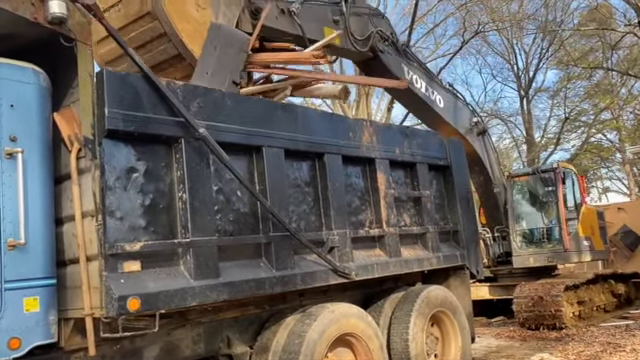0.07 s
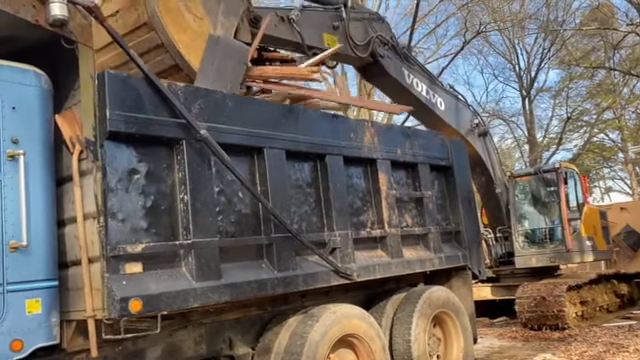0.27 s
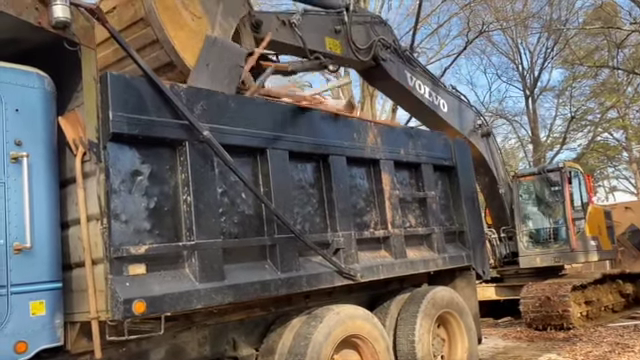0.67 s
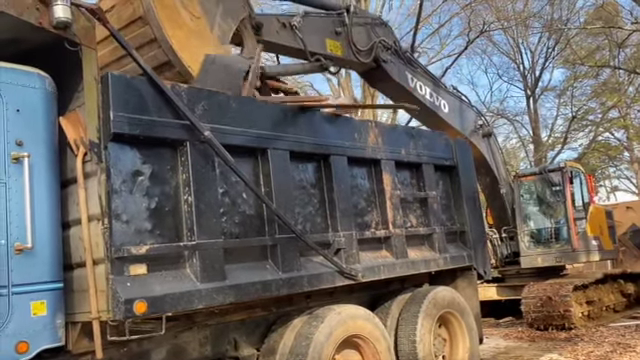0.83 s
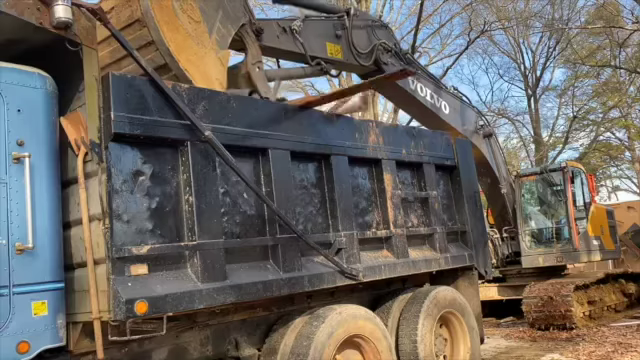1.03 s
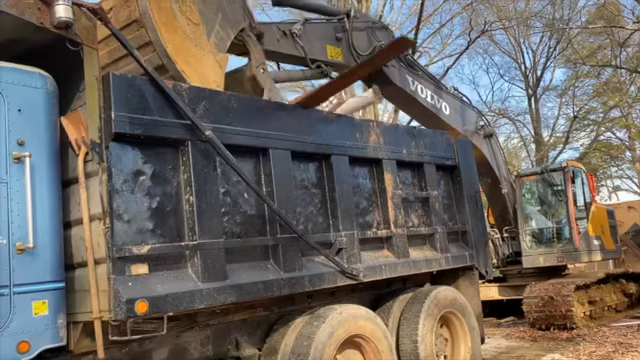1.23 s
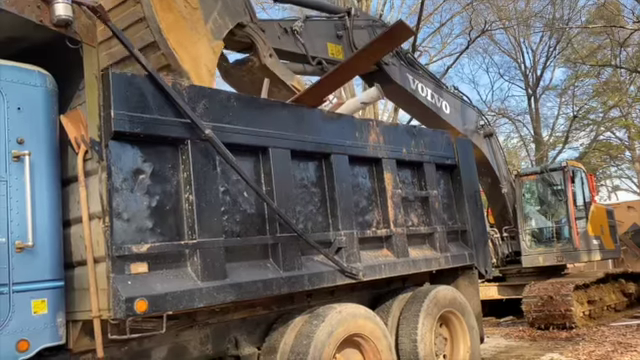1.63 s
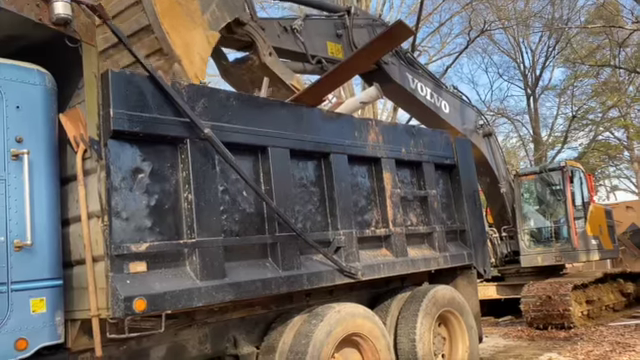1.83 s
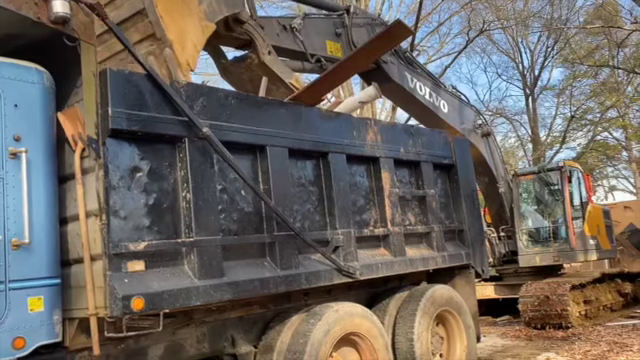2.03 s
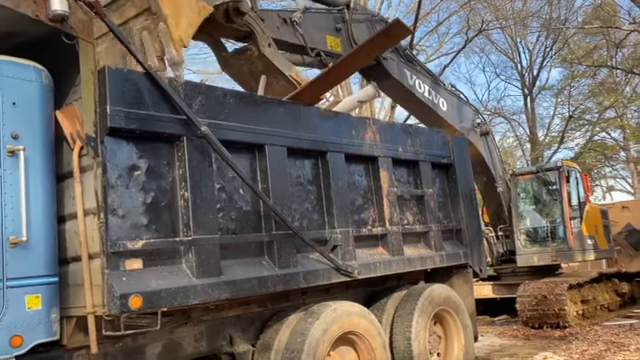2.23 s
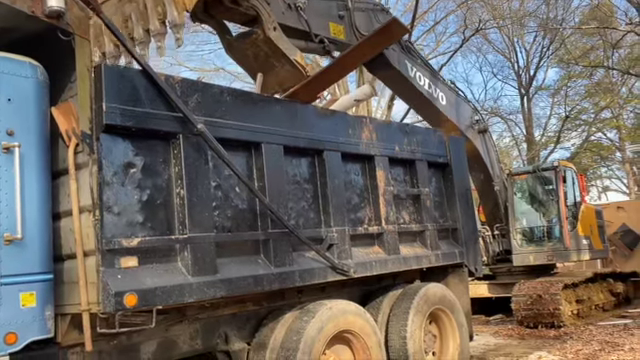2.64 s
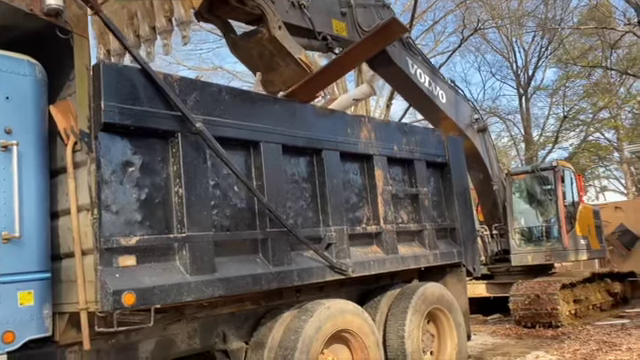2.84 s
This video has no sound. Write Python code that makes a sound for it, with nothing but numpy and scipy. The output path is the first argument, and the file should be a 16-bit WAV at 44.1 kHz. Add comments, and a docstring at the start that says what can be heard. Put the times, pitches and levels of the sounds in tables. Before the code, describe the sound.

Broken timber falls into a steel truck bed over an excavator's steady diesel rumble. After a faint hydraulic hiss, booming thuds begin at about 0.3 seconds. Knocking boards, snapping splinters and crackling grit are busiest around 0.8 to 1.3 seconds, with sharp knocks near 1.6. A short scrape comes at 2 seconds, then a soft last thud and a brief hydraulic whine, before the pump's hum swells from 2.5.

```python
"""An excavator tips a bucket of broken timber into the steel bed of a dump truck.
First the diesel runs, its hydraulic pump hums and oil hisses and sings in the valves.
Then scraps and grit slide out, boards knock, splinters snap and heavy pieces boom on the bed.
Near two seconds the bucket opens with a scrape and a brief whine from the pump.
The last pieces land, the pump's hum swells again and the diesel runs on."""
import sys
import numpy as np
from scipy import signal
from scipy.fft import rfft, irfft
from scipy.io import wavfile
from scipy.ndimage import uniform_filter1d

SR = 44100
rng = np.random.default_rng(int(sys.argv[2]) if len(sys.argv) > 2 else 0)


def output_pcm(signal):
    """Save a mono or channel-first signal as 16-bit PCM at the path in sys.argv[1].

    Samples are clipped to [-1, 1] before scaling.
    """
    pcm = np.clip(np.atleast_2d(signal).T, -1, 1) * 32767
    wavfile.write(sys.argv[1], SR, np.round(pcm).astype(np.int16))


N = 127890
T = np.arange(N) / SR

# The engine shaft slows under load. Each row: time in seconds, turns per second.
SHAFT_SPEED = [(0, 28.15), (.6, 28.2), (1.5, 26.7), (1.95, 28.0), (2.1, 27.3), (2.2, 27.05), (2.36, 27.3),
               (2.52, 27.75), (2.7, 28.1), (2.9, 28.1)]
# The diesel's tones. Each row: multiple of the shaft speed, relative level in dB.
DIESEL_TONES = [(2.5, -43), (3, -32), (5, -34.5), (6, -42.5), (6.75, -38)]
# The diesel works harder as the bucket turns. Each row: time in seconds, boost in dB.
DIESEL_EFFORT = [(0, -10.5), (.6, 2), (1.8, 2), (2.3, 1), (2.9, -3.5)]
# The pump's hum. Each row: time in seconds, level in dB, level of the octave above in dB.
PUMP_LEVELS = [(0, -32.5, -44), (.3, -32.5, -45), (1.0, -46, -62), (1.9, -41, -44), (2.45, -44, -43),
               (2.56, -33, -38), (2.9, -27.5, -35)]
# How loud four sounds are over time. Each row: time in seconds, level in dB.
WHINE_LEVEL = [(1.95, -70), (2.0, -52), (2.16, -52.5), (2.28, -47.5), (2.365, -42.5), (2.45, -47),
               (2.53, -50.5), (2.6, -62), (2.9, -70)]
HISS_LEVEL = [(0, -43.5), (.3, -45), (.42, -48.5), (1.7, -61), (2.2, -76), (2.9, -76)]
SCRAPS_LEVEL = [(0, -80), (.15, -41.5), (.31, -27), (.46, -36.5), (.53, -25.5), (.61, -30), (.75, -27.5),
                (.92, -19), (1.05, -24.5), (1.22, -19), (1.38, -27.5), (1.5, -31), (1.68, -27.5),
                (1.88, -39), (2.9, -67)]
GRIT_LEVEL = [(0, -53.5), (.25, -36), (.42, -48.5), (.5, -45), (.53, -34), (.63, -36), (.85, -33),
              (.98, -26), (1.08, -30.5), (1.16, -31.5), (1.22, -26), (1.3, -35), (1.5, -38.5),
              (1.75, -39.5), (1.87, -45), (2.9, -61)]
# The colour (bass to treble) of each noise. Each row: frequency in Hz, relative level in dB.
RUMBLE_COLOUR = [(25, -28), (45, 1.5), (75, 3), (150, 3.5), (320, -11.5), (600, -11.5), (1200, -18.5),
                 (2200, -25.5), (3500, -31), (6500, -38.5), (15000, -52)]
HISS_COLOUR = [(1000, -15), (2500, -4), (5000, 0), (7000, -2), (10000, -7), (15000, -11)]
MIC_HISS_COLOUR = [(3000, 0), (14500, 0), (16000, -30)]
SCRAPS_COLOUR = [(60, -8), (190, 5.5), (330, -4.5), (520, -2.5), (780, -9.5), (1000, -7.5), (1500, -17),
                 (2500, -30), (5000, -25), (15000, -34)]
GRIT_COLOUR = [(600, -9), (1800, 0), (2600, -2), (3700, -6), (5200, -9), (6700, -10), (10000, -16),
               (15000, -21)]
BUCKET_SCRAPE_COLOUR = [(900, -28), (1700, -11), (2150, 7), (2900, -9), (9000, -29)]
# The singing valves. Each row: pitch in Hz, starting level in dB.
VALVE_TONES = [(4969, -53), (5975, -56)]
# The steel bed's high notes. Each row: pitch in Hz, relative level in dB.
BED_HIGH_NOTES = [(895, -17), (1132, -17.5), (1476, -17.5), (1726, -23.5), (1832, -25), (1931, -16.5),
                  (2126, -21.5), (2254, -18), (2622, -18), (2773, -26), (3368, -27)]
# Boards knock together. Each row: start in seconds, level in dB, pitch in Hz, fade in seconds.
KNOCKS = [(.243, -32.5, 1400, .012), (.299, -32, 1100, .012), (.320, -28, 1130, .012),
          (.516, -31.5, 1400, .015), (.532, -28.5, 950, .015), (.767, -29, 950, .015),
          (.797, -24, 650, .016), (.844, -21.5, 1480, .014), (.885, -25, 680, .012),
          (.918, -21.5, 900, .012), (.944, -20.5, 620, .012), (.967, -20, 1750, .009),
          (.987, -19, 1950, .007), (1.026, -24, 700, .012), (1.066, -27, 1050, .01),
          (1.108, -24.5, 1000, .016), (1.184, -22, 1500, .01), (1.205, -23.5, 920, .014),
          (1.229, -21.5, 1250, .01), (1.331, -27.5, 950, .014), (1.541, -17, 990, .0075),
          (1.602, -21, 1000, .012), (1.610, -23.5, 1450, .008), (1.669, -12.5, 1080, .0062),
          (1.705, -32, 1300, .012), (1.77, -35, 1170, .008), (2.125, -35, 870, .02)]
# The notes of one board. Each row: multiple of its pitch, relative level in dB.
BOARD_NOTES = [(.47, -12.5), (1, 0.5), (1.42, -12), (2.3, -27), (3.6, -31)]
# Splinters snap. Each row: start in seconds, level in dB, strongest frequency in Hz, fade in seconds.
SNAPS = [(.308, -38, 4460, 0.029), (.326, -29.5, 2000, 0.017), (.519, -35, 2300, .022),
         (.578, -34, 2830, 0.012), (.772, -27.5, 6900, .009), (.846, -37, 5070, 0.012),
         (.958, -32, 12900, 0.0046), (.963, -24.5, 2820, 0.013), (.982, -21, 2500, 0.011),
         (1.181, -24.5, 2370, 0.017), (1.219, -21, 2400, 0.012), (1.229, -28.5, 5970, 0.013),
         (1.324, -38, 6000, .015), (1.408, -26, 2800, 0.012), (1.545, -38, 5000, 0.013),
         (1.91, -44, 4830, 0.021), (1.96, -38.5, 4900, 0.016), (2.12, -42.5, 4070, 0.021)]
# Heavy pieces land. Each row: start in seconds, level in dB, centre pitch in Hz,
# spread in octaves, crush time in seconds.
THUDS = [(.322, -10.5, 342.6, 0.67, 0.029), (.342, -11.5, 191, 0.75, 0.034), (.379, -18, 395, 0.53, 0.03),
         (.431, -15, 196, 0.29, 0.017), (.625, -22.5, 222, 0.85, 0.051), (.640, -18, 81, 0.73, 0.038),
         (0.662, -15, 175, 0.46, 0.043), (.704, -12.5, 149, 0.75, 0.048), (.780, -19.5, 410, 0.51, .033),
         (.799, -11, 146, .7, .014), (.915, -20.5, 310, 1.05, 0.17), (.965, -14, 174, 0.52, 0.061),
         (1.034, -15.5, 147, 0.74, 0.029), (1.105, -18.5, 172.7, 0.88, 0.029),
         (1.229, -6.5, 228, 0.7, 0.014), (1.273, -17.5, 205, 0.44, 0.023), (1.280, -22, 452, 0.29, 0.027),
         (1.345, -20, 345, 0.64, 0.035), (1.603, -16.5, 442, 0.34, 0.029), (1.632, -18.5, 150, 0.56, 0.029),
         (1.670, -23, 411, 0.52, 0.034), (2.125, -31, 416, 1.06, 0.04), (2.17, -28, 151, 0.36, .17)]
# The steel bed's low notes. Each row: pitch in Hz, relative level in dB, seconds to fade by 60 dB.
BED_LOW_NOTES = [(66.4, 1, 0.4), (115.7, -1, 0.66), (132, -9.5, 0.25), (163, -3, .27), (189, -1, 0.39),
                 (223.2, 2, 0.74), (271.7, -4, 0.8), (320.6, -9.5, 1), (414.4, 3, 0.49), (440, -12, 0.8),
                 (630, 0, 1), (920, 5, .35)]
# The bucket scrapes as it opens. Each row: time in seconds, level in dB.
BUCKET_SCRAPE_LEVEL = [(1.92, -65), (1.975, -41), (2.01, -42.5), (2.1, -70)]
# How wide noises sound. Each row: frequency in Hz, side level minus middle level in dB.
STEREO_WIDTH = [(100, -24), (200, -21), (350, -15), (700, -11), (1400, -5), (2800, -1), (6000, -2),
                (14000, -1)]
# Where the load is heard. Each row: frequency in Hz, left level minus right level in dB.
LOAD_PAN = [(200, 0.4), (380, -2.2), (2400, -1.9), (4400, 4.5), (8000, 0.5)]


def from_db(db):
    """Turn decibels into a number to multiply by."""
    return 10 ** (np.asarray(db) / 20)


def rms_one(x):
    """Scale a sound so its average level (rms) is 1."""
    return x / np.sqrt(np.mean(x ** 2) + 1e-20)


def in_time(rows):
    """Join a table's points with lines: one curve for each column after the time."""
    times, *columns = np.transpose(rows)
    return [np.interp(T, times, column) for column in columns]


def at_hz(points, hz):
    """Look up a table's dB at any frequency, with octaves evenly spaced."""
    f, db = np.transpose(points)
    return np.interp(np.log(hz), np.log(f), db)


def bins(size):
    """The frequencies in the spectrum of a sound this many samples long."""
    return np.maximum(np.fft.rfftfreq(size, 1 / SR), 1)


def drift(hz):
    """A random wobble, mostly slower than the given rate."""
    return rms_one(irfft(rfft(rng.standard_normal(N)) / (1 + (bins(N) / hz) ** 2), N))


def coloured(pair, gain):
    """Filter two unrelated signals into one stereo sound, wider in the treble."""
    size = pair.shape[1]
    mid, side = rfft(pair) * gain
    side = side * from_db(at_hz(STEREO_WIDTH, bins(size)))
    return rms_one(irfft(np.array([mid + side, mid - side]), size))


def noise(colour):
    """Steady stereo noise of a given colour."""
    return coloured(rng.standard_normal((2, N)), from_db(at_hz(colour, bins(N))))


def even_noise(gain, size):
    """Filtered noise with its level evened out, like countless notes ringing at once."""
    x = coloured(rng.standard_normal((2, size)), gain)
    for _ in range(2):
        power = uniform_filter1d(np.mean(x ** 2, axis=0), size=300)
        x = x / np.sqrt(uniform_filter1d(power, size=300) + 1e-9)
    return x


def ring(x, hz, ring_s):
    """Each click in x starts a tone that fades by 60 dB in ring_s seconds."""
    r, w = from_db(-60 / (ring_s * SR)), 2 * np.pi * hz / SR
    return signal.lfilter([0, np.sin(w)], [1, -2 * r * np.cos(w), r * r], x + 1e-18)


def add(out, start, sound):
    """Mix a sound in at a start time in seconds."""
    i = max(int(start * SR), 0)
    out[:, i:i + sound.shape[-1]] += sound[..., :N - i]


def shaft_tone(multiple, db, rough):
    """A slightly unsteady tone that follows the speed of the engine shaft."""
    angle = multiple * 2 * np.pi * np.cumsum(in_time(SHAFT_SPEED)[0]) / SR
    steady = np.sin(angle + rng.uniform(0, 2 * np.pi))
    wobble = drift(1.7) * np.cos(angle) + drift(14) * np.sin(angle)
    return np.sqrt(2) * from_db(db) * (steady + rough * wobble)


def diesel():
    """The engine's tones grow louder under load, over steady rumble and fan noise."""
    tones = sum(shaft_tone(multiple, db, rough=.25) for multiple, db in DIESEL_TONES)
    return from_db(in_time(DIESEL_EFFORT)[0]) * tones + from_db(-28.5) * noise(RUMBLE_COLOUR)


def pump(pistons=9):
    """Each piston pulses once a turn, making a hum; a brief whine sits at ten times its pitch."""
    hum_db, octave_db = in_time(PUMP_LEVELS)
    hum = shaft_tone(pistons, hum_db, rough=.038) + shaft_tone(2 * pistons, octave_db, rough=.28)
    whine = shaft_tone(10 * pistons, in_time(WHINE_LEVEL)[0], rough=.08)
    flutter = 1 + .19 * drift(60)
    return hum + whine * flutter


def valves(fade_s=.3):
    """Oil forced through a narrow gap hisses, and at first sings in thin wavering tones."""
    hiss = from_db(in_time(HISS_LEVEL)[0]) * noise(HISS_COLOUR)
    tones = sum(from_db(db) * np.sin(2 * np.pi * hz * T + .68 * drift(36)) for hz, db in VALVE_TONES)
    return hiss + tones * np.exp(-(T / fade_s) ** 2)


def microphone_hiss():
    """The microphone's faint, even hiss."""
    return from_db(-57.5) * noise(MIC_HISS_COLOUR)


def tumble(per_s, colour, size_db, ring_gain, cycles, echo_s, echo_db, spots=6, size=8192):
    """Small pieces click and ring at random in several spots, each with its own echoes."""
    out = 0
    for _ in range(spots):
        hits = rng.random(N) < per_s / spots / SR
        strength = from_db(size_db * np.minimum(rng.exponential(1, N), 3))
        clicks = hits * strength * rng.choice([-1, 1], N)
        pitches = 400 * 2 ** ((np.arange(10) + rng.random(10)) * .4)  # 400 to 6400 Hz
        chosen = rng.integers(0, len(pitches), N)  # each click rings one pitch
        pieces = clicks + sum(ring_gain * hz / SR * ring(clicks * (chosen == k), hz, cycles / hz)
                              for k, hz in enumerate(pitches))
        echoes = rng.standard_normal((2, size)) * np.exp(-T[:size] / echo_s)
        echoes = from_db(echo_db) * echoes / np.sqrt(np.sum(echoes ** 2) / 2)
        echoes[:, 0] = [1, rng.choice([-1, 1])]  # the direct sound
        out = out + signal.fftconvolve(pieces[None], echoes, axes=1)[:, :N]
    return coloured(out, from_db(at_hz(colour, bins(N))))


def wood_scraps():
    """Scraps tumble over the steel bed and keep its high notes ringing."""
    scraps = tumble(330, SCRAPS_COLOUR, size_db=2.5, ring_gain=5.3, cycles=19.5, echo_s=.022, echo_db=1)
    steel = sum(from_db(db) * rms_one(ring(scraps, hz, ring_s=.14)) for hz, db in BED_HIGH_NOTES)
    return from_db(in_time(SCRAPS_LEVEL)[0]) * (scraps + steel)


def grit():
    """Tiny grains crackle as they slide out of the bucket."""
    grains = tumble(1000, GRIT_COLOUR, size_db=-.5, ring_gain=2.23, cycles=19, echo_s=.0061, echo_db=2)
    return from_db(in_time(GRIT_LEVEL)[0]) * grains


def board_knocks(sharpness=9, dull_hz=3400, bounce_s=.021, bounce_loss_db=10.5, size=16384):
    """A board clacks with its own notes, bounces twice and echoes between the bed's walls."""
    out, t, f = np.zeros((2, N)), T[:size], bins(size)
    for start, db, pitch, fade_s in KNOCKS:
        fade = np.exp(-t / fade_s)
        notes = power = 0
        for ratio, note_db in BOARD_NOTES:
            hz, gain = pitch * ratio, from_db(note_db)
            notes += gain * np.sin(2 * np.pi * hz * t)
            power += gain ** 2 / ratio / (1 + (sharpness * (f / hz - hz / f)) ** 2)  # colours the echo
        direct = (1 - np.exp(-t * pitch)) * fade * notes
        echo_level = (1 - np.exp(-t / .002)) * (fade + from_db(-17) * np.exp(-t / .04))
        echo = echo_level * even_noise(np.sqrt(power / (1 + (f / dull_hz) ** 4)), size)
        clack = from_db(db + 3) * direct + from_db(db - 5) * echo
        for bounce, lag_s in enumerate(bounce_s * rng.uniform(.8, 1.2, 3)):
            add(out, start + bounce * lag_s, from_db(-bounce * bounce_loss_db) * clack)
    return out


def splinter_snaps(spread_octaves=.34, size=4096):
    """Splitting wood gives short, bright cracks."""
    out = np.zeros((2, N))
    for start, db, hz, fade_s in SNAPS:
        colour = 1 / (1 + (np.log2(bins(size) / hz) / spread_octaves) ** 2)
        add(out, start, from_db(db) * np.exp(-T[:size] / fade_s) * even_noise(colour, size))
    return out


def heavy_thuds(rise_s=.004, boom_s=.03, tail_s=.18, size=32768):
    """Each landing booms, shakes the steel plates while the piece crushes, then leaves them ringing."""
    out, t = np.zeros((2, N)), T[:size]
    hz, note_db, ring_s = np.transpose(BED_LOW_NOTES)
    notes = np.sin(2 * np.pi * hz[:, None] * t) * from_db(-60 * t / ring_s[:, None])
    for start, db, centre, spread, crush_s in THUDS:
        def colour(f):
            return 1 / (1 + (np.log2(f / centre) / spread) ** 4)
        shake_level = np.exp(-(t / crush_s) ** 2) + from_db(-13) * np.exp(-t / tail_s)
        shake = even_noise(colour(bins(size)), size) * shake_level
        strength = colour(hz) * from_db(note_db - 4.5 + rng.normal(0, .73, len(hz)))
        ringing = (strength * rng.choice([-1, 1], len(hz))) @ notes
        boom = from_db(3.5) * np.sin(2 * np.pi * centre * t)  # the plate's first swings
        boom_share = .8 * np.exp(-(t / min(crush_s, boom_s)) ** 2)
        landing = boom_share * boom + np.sqrt(1 - boom_share ** 2) * (shake + ringing)
        add(out, start, from_db(db) * np.minimum(t / rise_s, 1) * landing)
    return out


def bucket_scrape():
    """Steel slips over wood in a short, rough run of tiny jerks."""
    jerks = tumble(1100, BUCKET_SCRAPE_COLOUR, size_db=-1, ring_gain=2, cycles=10,
                   echo_s=.0036, echo_db=-4, spots=2)
    return from_db(in_time(BUCKET_SCRAPE_LEVEL)[0]) * jerks


def scene():
    """The machine runs while the load falls, its middle pitches to the right, its treble to the left."""
    background = diesel() + pump() + valves() + microphone_hiss()
    load = wood_scraps() + grit() + board_knocks() + splinter_snaps() + heavy_thuds() + bucket_scrape()
    pan_db = at_hz(LOAD_PAN, bins(N)) / 2
    return background + irfft(rfft(load) * from_db([pan_db, -pan_db]), N)


def record(dry):
    """Round off the tallest peaks and cut the very highest treble."""
    rounded = dry / (1 + dry ** 6) ** (1 / 6)
    return signal.sosfilt(signal.cheby2(16, 70, 16200, fs=SR, output="sos"), rounded)


dry = scene()
out = record(dry)
output_pcm(out)
```